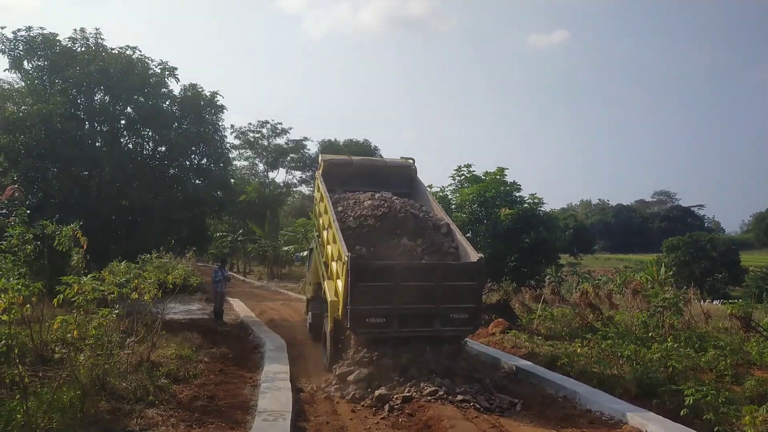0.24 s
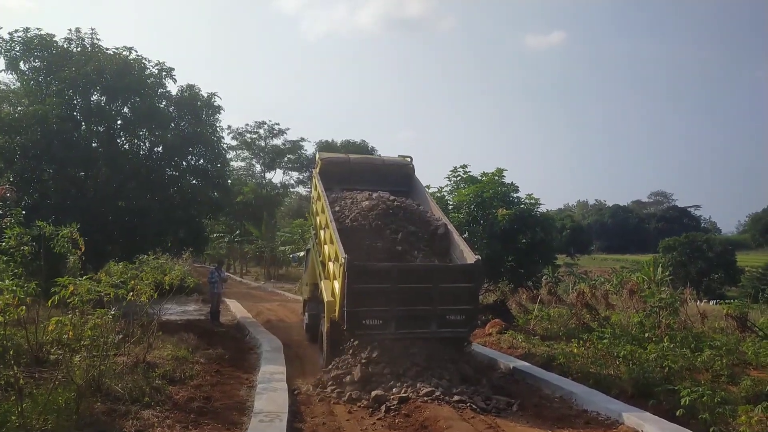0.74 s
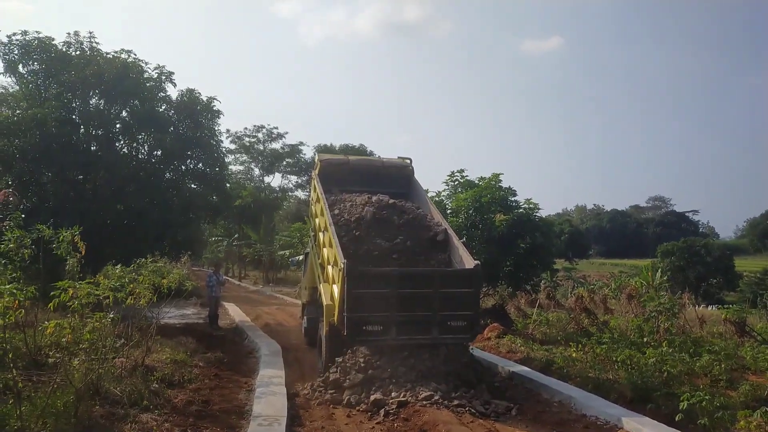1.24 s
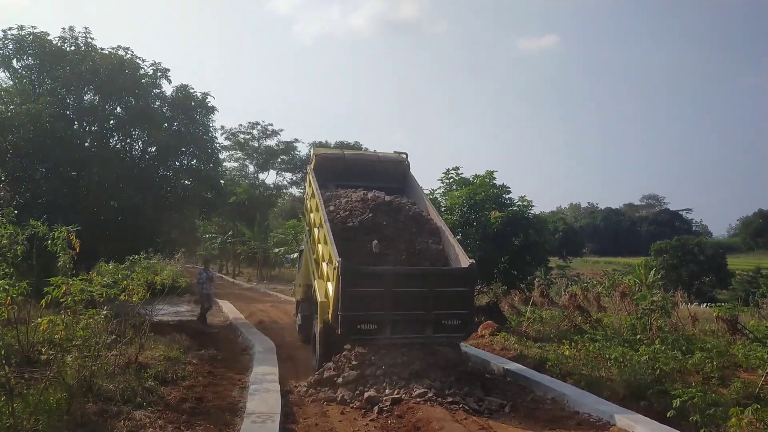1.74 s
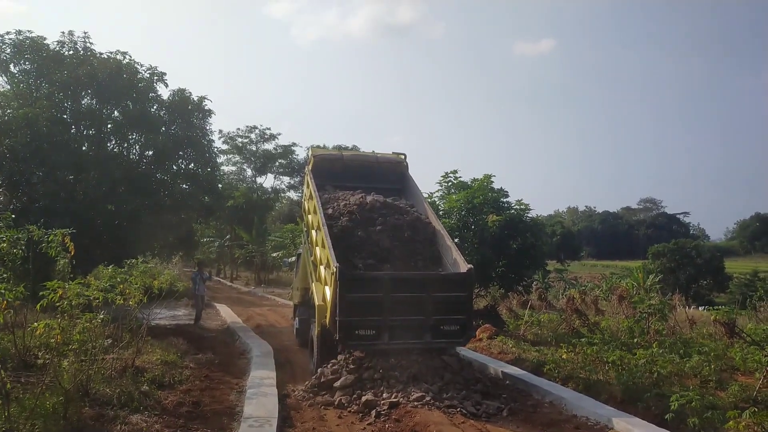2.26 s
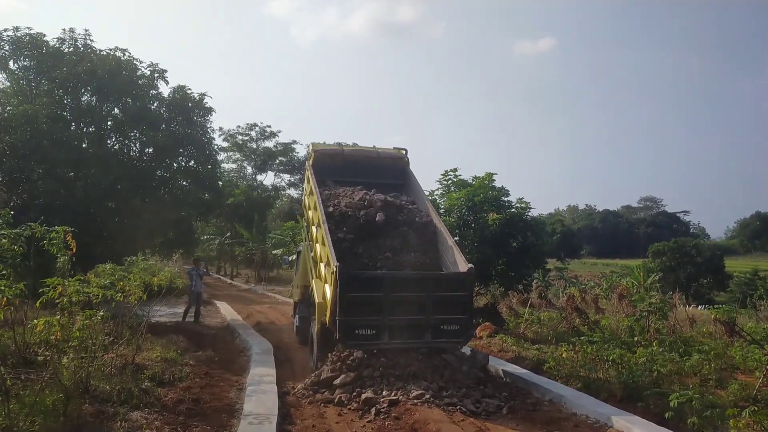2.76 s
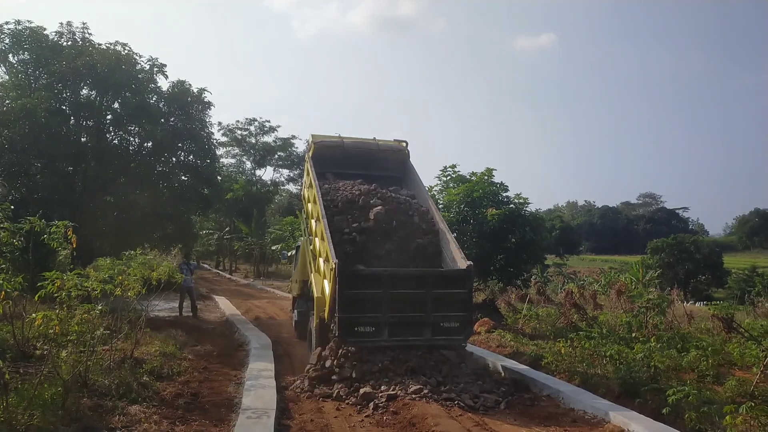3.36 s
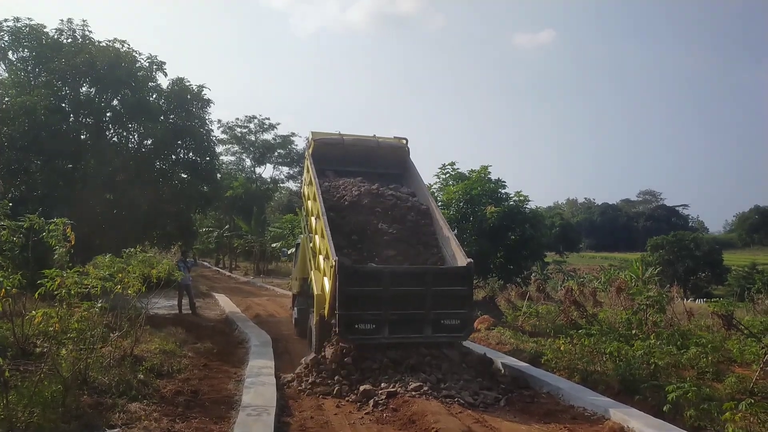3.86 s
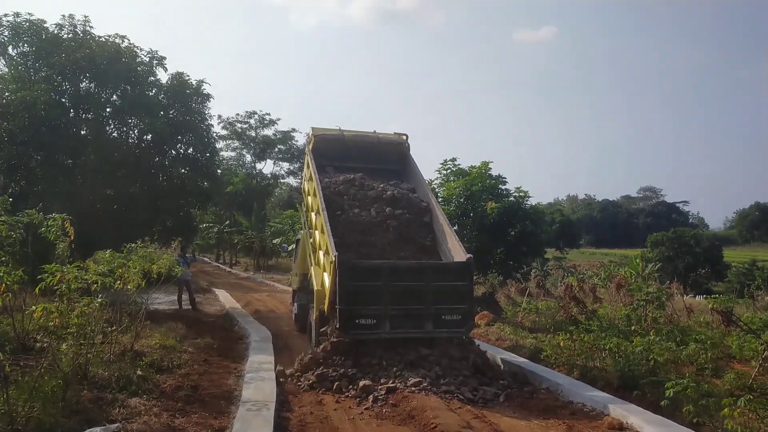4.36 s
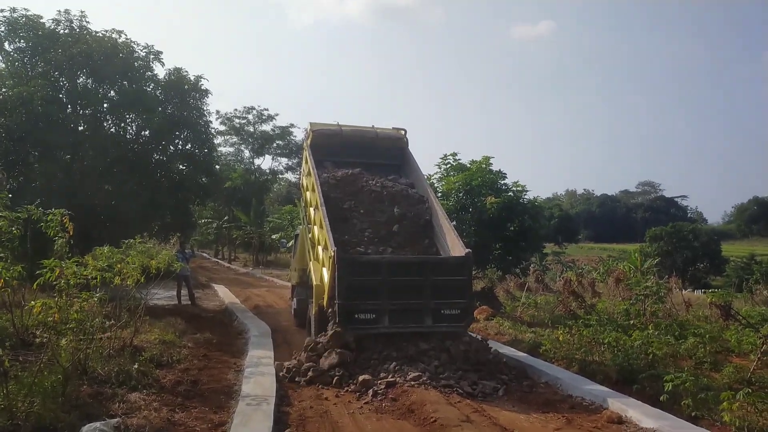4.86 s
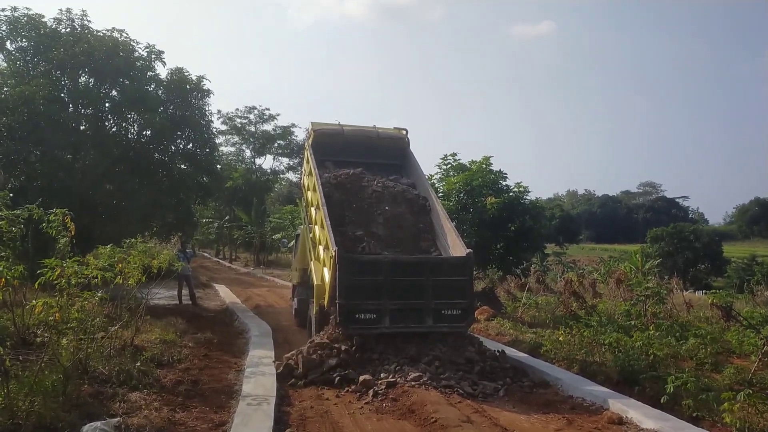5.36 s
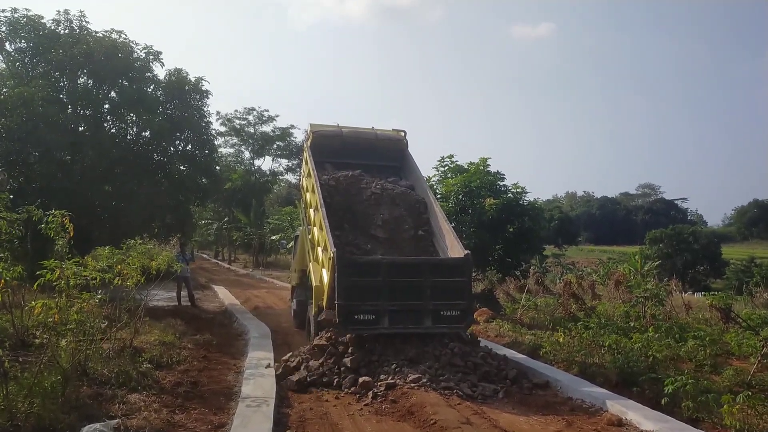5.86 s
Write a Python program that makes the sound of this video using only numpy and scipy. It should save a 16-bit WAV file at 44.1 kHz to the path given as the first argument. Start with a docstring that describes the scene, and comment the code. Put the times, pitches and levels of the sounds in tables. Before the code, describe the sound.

Outdoors, a tipper truck sheds a load of rocks. A dense run of hard clacks and rattling gravel opens, thins around the second second, then picks up strongly near three seconds. Each rock cracks, crumbles and briefly rings the steel bed. Low thumps grow more frequent later, while a diesel hums steadily and wind buffets the microphone. A faint diffuse echo returns from trees.

```python
"""Rocks clack and gravel slides as a tipper truck unloads outdoors, its diesel running low and steady.
Each clack is a crack plus a crumbling burst of noise, loose chips and a ring of the steel bed.
Heavy rocks thump with a low swinging tone; chips snap; pebbles, grit and sand make the slide.
Behind them are a faint echo from trees, an engine hum with puffs of clatter, and low wind rumble."""
import sys
import numpy as np
from scipy import signal
from scipy.fft import rfft, irfft, next_fast_len
from scipy.io import wavfile
from scipy.ndimage import uniform_filter1d, minimum_filter1d, map_coordinates

SR = 44100
rng = np.random.default_rng(int(sys.argv[2]) if len(sys.argv) > 2 else 0)


def transcribe(u):
    """Save the signal u as a 16-bit wav file named by the first command-line argument.

    u: samples, shape (n,) or (channels, n), limited to [-1, 1]; the rate is SR.
    q: integer samples, one column per channel.
    """
    v = np.clip(np.atleast_2d(u).T, -1, 1)
    q = np.round(v * 32767).astype(np.int16)
    wavfile.write(sys.argv[1], SR, q)


N = 269451  # length in samples
TOP_HZ = 15550  # nothing is kept from here up


def amp(db):
    """Turn decibels into a gain."""
    return 10 ** (np.asarray(db) / 20)


def unit(x):
    """Scale a sound to rms 1."""
    return x / np.sqrt(np.mean(x ** 2) + 1e-20)


def curves(rows):
    """Draw straight lines between table rows: one value per sample for each column after the time."""
    s, *cols = np.transpose(rows)
    return [np.interp(np.arange(N) / SR, s, c) for c in cols]


def wobble(rate, size=N):
    """A smooth random curve through `rate` random points per second."""
    knots = rng.standard_normal(int(size * rate / SR) + 4)
    return map_coordinates(knots, [np.arange(size) * rate / SR])


def filtered(x, response):
    """Multiply the spectrum of x by a gain that depends on frequency."""
    m = next_fast_len(len(x) + 8192)
    spectrum = rfft(x, m) * response(np.fft.rfftfreq(m, 1 / SR))
    return irfft(spectrum, m)[:len(x)]


def coloured(x, points):
    """Shape x by (f/Hz, level/dB) points joined on a log frequency axis, then scale to rms 1."""
    f, db = np.transpose(points)
    return unit(filtered(x, lambda hz: amp(np.interp(np.log(hz + 1), np.log(f), db))))


def fade(t, t60):
    """Exponential decay that drops 60 dB in t60 seconds."""
    return np.exp(-np.log(1000) * t / max(t60, 1e-3))


def add(track, s, sound):
    """Mix a sound into the track at time s, cut off at the end of the track."""
    start = max(round(s * SR), 0)
    part = track[start:start + len(sound)]
    part += sound[:len(part)]


def ticks(rate, spread_db):
    """Random contacts, `rate` per second on average, with sizes scattered in dB."""
    hits = rng.random(N) < rate / SR
    return hits * amp(spread_db * np.clip(rng.standard_normal(N), -2, 2))


def stony(x, spread_db, count=52):
    """Every stone has its own shape, and so its own random resonances."""
    hz = np.geomspace(300, TOP_HZ, count)
    return coloured(x, np.transpose([hz, spread_db * rng.standard_normal(count)]))


# Ringing tones (modes) of the steel bed: f/Hz, typical level/dB, time to fall 60 dB t60/s
BED_MODES = [(521, -2, 0.4), (605, -3, 0.26), (677, 0.5, 0.22), (715, -6.5, 0.66), (805, -14, 0.22),
             (923, -11, 0.45), (971, -1, 0.17), (1245, -8, 0.089), (1367, 1, 0.2), (1502, -12, 0.42),
             (1937, 1.5, 0.21), (1995, -6.5, 0.17), (2980, -12, 0.16)]


def bed_ring(t):
    """The steel bed answers a blow with decaying tones; each blow excites them differently."""
    hz, db, t60 = np.transpose(BED_MODES)
    strength = amp(db + 2.7 * rng.standard_normal(len(BED_MODES)))
    phase = rng.uniform(0, 2 * np.pi, len(BED_MODES))
    ring = np.zeros(len(t))
    for gain, f, start, decay in zip(strength, hz, phase, t60):
        ring += gain * np.sin(2 * np.pi * f * t + start) * fade(t, decay)
    return ring / np.linalg.norm(strength)


# Rocks striking: t/s, relative level/dB, hardness (tilt up to 2200 Hz, dB per octave),
# grit (treble level/dB at 4600 Hz)
ROCKS = [(0.006, -22, 1.5, -6), (0.051, -22, 2.5, -1.5), (0.137, -28, 2, -2), (0.158, -25.5, -3, 1),
         (0.174, -25.5, -3, 0), (0.202, -24, -3.5, -5), (0.288, -32, 4, -9), (0.337, -21, -0.5, -0.5),
         (0.415, -33.5, 2, -10), (0.463, -33.5, 6, 2), (0.712, -19.5, 8, -4.5), (0.736, -22, -1, 0.5),
         (0.843, -21, 5.5, 1), (0.888, -37.5, -7, -10), (0.942, -31, -8, -10), (1.013, -28.5, 2, 3.5),
         (1.147, -30, -3.5, -17), (1.222, -28, 0.5, -5), (1.528, -36, 9, 6), (1.84, -29.5, 0, 2),
         (2.05, -36, -0.5, -17), (2.311, -25, -3, 0), (2.338, -34.5, 10, 3), (2.437, -37.5, -5, 7.5),
         (2.833, -29, -2, 8), (2.845, -25, -5, -4), (2.867, -20.5, 5, 0.5), (2.913, -19, -3, -6.5),
         (2.934, -30, -2, -5), (3.048, -30, 13, 1), (3.085, -27.5, -5, -21), (3.125, -26.5, -1.5, -3),
         (3.166, -25.5, 3.5, -1), (3.295, -26.5, -0.5, -3.5), (3.344, -26, -9, -6), (3.494, -30.5, 11, -2),
         (3.575, -20.5, 0.5, -3), (3.619, -33.5, -4, 3), (3.701, -25.5, -2, -8), (3.843, -31.5, -3.5, 5.5),
         (3.964, -30.5, -8, -19), (4.16, -31.5, -6, -2), (4.262, -34, -6, -1), (4.3, -22.5, -1, -2),
         (4.727, -34.5, -5.5, -6), (4.838, -33, 1, -4), (4.893, -32.5, 5, 6.5), (5.116, -27, 9, -0.5),
         (5.209, -26, 15, 1.5), (5.226, -29, -4, 0), (5.312, -28, 21, -22), (5.751, -31, -4, -2),
         (5.892, -31.5, -6.5, -7)]
# Basic colour of a rock's contact: f/Hz, level/dB
STONE = [(180, -15), (300, -6.5), (411, -16.5), (654, 5), (785, -6.5), (958, -0.5), (1110, -7.5),
         (1310, 3.5), (1660, -9.5), (1830, -1.5), (2310, -4), (5030, -24), (8140, -23.5), (9140, -31.5),
         (15800, -34)]
ROCK_T60, CRACK_T60, ROCK_ATTACK_S = 0.18, 0.015, .00015  # s: crushing decay, crack decay, rise of the blow
CHIP_RATE, CHIP_T60, SCATTER_T60 = 70, 0.1, 0.49  # shaken-loose chips per s; decay/s of each, of the shower


def rocks(burst_db=6.5, crack_db=5, ring_db=-5, crumble_db=3, crumble_rate=300, firm_s=0.042,
          shape_db=2, scatter_db=-21, dust_growth=2.0):
    """Each rock lands with a crack and a burst of crushing contacts, scatters chips and rings the bed."""
    out, t = np.zeros(N), np.arange(SR // 3) / SR
    corners = np.log2([400, 1300, 2200, 4600, 15000])  # Hz, as octaves
    decay = fade(t, ROCK_T60)
    decay_rms = np.sqrt(np.mean(decay ** 2))
    for s, db, hardness, grit_db in ROCKS:
        # hardness tilts the clack around 1300 Hz; grit sets the treble, dust_growth the very top
        tilt = np.r_[hardness * (corners[:3] - corners[1]), grit_db, dust_growth * grit_db]

        def contact(x):
            """Stone colour, tilted by this rock's hardness and grit."""
            stone = coloured(x, STONE)
            return unit(filtered(stone, lambda hz: amp(np.interp(np.log2(hz + 1), corners, tilt))))

        crush = contact(stony(rng.standard_normal(len(t)), spread_db=shape_db))
        # the crumbling flutter is strongest at the blow and dies away
        flutter_db = -crumble_db * fade(t, firm_s) * wobble(crumble_rate, size=len(t))
        burst = decay * amp(flutter_db)
        # loosened chips land one by one
        taps = (rng.random(len(t)) < CHIP_RATE / SR) * rng.uniform(0.21, 1, len(t))
        chip_levels = signal.fftconvolve(taps, fade(t, CHIP_T60))[:len(t)]
        scatter = unit(chip_levels) * fade(t, SCATTER_T60)
        loudness = np.hypot(burst, amp(scatter_db) * scatter)
        blow = amp(burst_db) * unit(crush * loudness) * decay_rms
        # the first contact cracks and rings the steel
        blow += amp(crack_db) * contact(rng.standard_normal(len(t))) * fade(t, CRACK_T60)
        blow += amp(ring_db) * bed_ring(t)
        add(out, s, amp(db) * blow * (1 - np.exp(-t / ROCK_ATTACK_S)))
    return out


# Heavy, dull thumps: t/s, relative level/dB, thud level/dB before its trim, swing pitch f/Hz
THUMPS = [(0.334, -24, 1, 100), (0.944, -13.5, -12.5, 102), (1.834, -10, -13, 94), (2.311, -5, -13.5, 99),
          (2.637, -16, -28, 140), (2.702, -13, -25, 57), (3.086, -18.5, -10, 77.5),
          (3.755, -12.5, -13.5, 117), (3.964, -16, -5.5, 130), (4.052, -5.5, -16, 53.4),
          (4.156, -8.5, -7.5, 75.5), (4.298, -9.5, -10, 107), (4.895, -17, -3.5, 89), (4.944, -13, -20, 97),
          (5.316, -10, -13, 61), (5.365, -5.5, -6, 81), (5.42, -12, -10, 88), (5.683, -12.5, -14.5, 55.7),
          (5.953, -5.5, -15, 68), (6.088, -8, -11, 113)]
# Colour of the dull thud: f/Hz, level/dB
THUD = [(80, -15), (130, 4), (170, 6.5), (215, 3.5), (280, 3), (340, -9), (430, -10.5), (620, -48)]
THUMP_T60, THUD_T60 = 0.16, .13  # decay/s of the low swing and of the dull thud


def thumps(tone_db=-5, thud_db=1.0, attack=0.0043, waver=0.075):
    """A heavy rock gives a few uneven low swings and a dull thud of noise."""
    out, t = np.zeros(N), np.arange(SR // 3) / SR
    rise = 1 - np.exp(-t / attack)  # attack in s
    life, thud_life = rise * fade(t, THUMP_T60), rise * fade(t, THUD_T60)
    thud_rms = np.sqrt(np.mean(thud_life ** 2))
    for s, db, dull_db, hz in THUMPS:
        pitch = hz * (1 + waver * wobble(106, size=len(t)))
        swing = life * np.sin(2 * np.pi * np.cumsum(pitch) / SR)
        thud = unit(coloured(rng.standard_normal(len(t)), THUD) * thud_life) * thud_rms
        add(out, s, amp(db) * (amp(tone_db) * swing + amp(dull_db + thud_db) * thud))
    return out


# How much gravel slides down the bed: t/s, flow level/dB before the gravel trim
SLIDE = [(0, -27.5), (.31, -28), (.47, -35), (.75, -36), (.9, -27), (1.19, -32.5), (1.29, -39.5),
         (2.23, -41), (2.74, -38.5), (2.91, -35), (3.4, -33.5), (3.93, -30.5), (4.19, -33), (4.37, -33),
         (4.7, -36), (5.0, -36.5), (5.48, -37), (6.11, -37.5)]
# Colour of rattling gravel, also of the engine's clatter: f/Hz, level/dB
GRAVEL = [(190, -8), (330, -3), (373, -22), (401, -13), (563, 1.5), (893, -2.5), (972, -0.5), (1070, -2.5),
          (1250, 2.5), (1680, -1), (1920, 2.5), (2090, -1.5), (2360, 2.5), (3650, -12.5), (6000, -28.5),
          (7800, -35), (13200, -120)]
# Bright colour of sand and grit, also of a chip's snap: f/Hz, level/dB
SAND = [(2000, 10), (4000, 9.5), (5200, 3), (5600, 5.5), (6200, 2.5), (7900, 7), (9000, 0.5), (12000, -2.5),
        (15500, 3.5)]
PEBBLE_RATE, PEBBLE_T60 = 9, 0.063  # contacts per s for each pebble shape; decay/s
# hiss level/dB at the start for average flow; dB per dB of flow; fines running out, dB per s
SAND_DB, SAND_FOLLOWS, SAND_DRAIN_DB_PER_S = -40, 0.54, 1.23


def slide(gravel_db=-1, grit_db=-5, ring_db=-23, shape_db=4.0, count=20):
    """Pebbles of many shapes rattle down the bed; grit ticks over sand hiss that slowly runs out."""
    flow_db, = curves(SLIDE)
    hiss_db = SAND_DB + SAND_FOLLOWS * (flow_db - flow_db.mean())
    hiss_db -= SAND_DRAIN_DB_PER_S * np.arange(N) / SR
    t = np.arange(SR // 4) / SR
    rattle = np.zeros(N)
    for _ in range(count):
        pebble = stony(rng.standard_normal(len(t)), spread_db=shape_db) * fade(t, PEBBLE_T60)
        pebble += amp(ring_db) * bed_ring(t)
        rattle += signal.oaconvolve(ticks(rate=PEBBLE_RATE, spread_db=1.5), pebble)[:N]
    bursts = signal.oaconvolve(ticks(rate=98, spread_db=8.0), fade(t, 0.047))[:N]
    grit = coloured(bursts * rng.standard_normal(N), SAND)
    sand = coloured(rng.standard_normal(N), SAND) * amp(wobble(30))
    gravel = amp(flow_db + gravel_db) * coloured(rattle, GRAVEL)
    return gravel + amp(hiss_db) * (sand + amp(grit_db) * grit)


# Small, hard chips clicking on the heap: t/s, relative level/dB, centre of the ring f/Hz
CHIPS = [(0.666, -26, 2300), (1.429, -25, 2860), (2.285, -25, 3460), (4.539, -24, 2040), (4.787, -28, 2280),
         (5.339, -18, 2950), (5.668, -34, 7660)]


def chips(ring_db=-7, snap_db=-15, t60=0.07, width=0.4):
    """A small chip gives a bright snap and a very short ring, spread broadly around its pitch."""
    out, t = np.zeros(N), np.arange(SR // 8) / SR
    for s, db, pitch in CHIPS:
        noise = rng.standard_normal(len(t))
        ring = unit(filtered(noise, lambda hz: np.exp(-((hz / pitch - 1) / width) ** 2)))
        snap = coloured(rng.standard_normal(len(t)), SAND)
        click = amp(ring_db) * ring + amp(snap_db) * snap
        add(out, s, amp(db) * click * fade(t, t60))
    return out


ECHO_DB = -20  # level of the trees' answer


def trees(x, t60=0.62, delay=0.095):
    """Trees beside the track return a faint, diffuse echo: a noise tail that swells, then decays."""
    t = np.arange(SR // 2) / SR
    noise = coloured(rng.standard_normal(len(t)), [(200, -2.5), (2500, -5.5), (10000, -15.5)])
    tail = noise * fade(t, t60) * (1 - np.exp(-t / delay))
    return signal.fftconvolve(x, tail / np.linalg.norm(tail))[:N]


# Engine hum: multiple of the firing rate, typical rms level/dB
ENGINE = [(1, -47), (2, -50), (3, -69), (4, -74), (5, -56.5), (6, -59.5)]
FIRING_HZ = 37.7  # average firing rate


def engine(clatter_db=-48, rough_db=2):
    """The diesel hums at multiples of its firing rate, with a puff of clatter at every firing."""
    firing_rate = FIRING_HZ * (1 + 0.01144 * wobble(2.8))
    turn = 2 * np.pi * np.cumsum(firing_rate) / SR
    hum = np.zeros(N)
    for multiple, db in ENGINE:
        level = np.sqrt(2) * amp(db + rough_db * wobble(4.25))
        hum += level * np.sin(round(multiple) * turn + rng.uniform(0, 2 * np.pi))
    clatter = coloured(rng.standard_normal(N), GRAVEL) * np.exp(np.cos(turn))
    return hum + amp(clatter_db) * unit(clatter)


# Wind on the microphone: t/s, level/dB
WIND = [(0, -49), (.25, -36), (1.2, -39.5), (2.4, -37.5), (2.72, -29), (3.5, -39.5), (4.05, -27),
        (4.27, -34.5), (4.7, -46.5), (5.36, -23), (5.65, -31.5), (6.11, -27.5)]
# Colour of the wind's low rumble: f/Hz, level/dB
BUFFET = [(10, 2), (25, -1.5), (45, -2.5), (90, -0.5), (160, -7.5), (280, -18.5), (420, -28.5), (900, -50)]


def wind(level_db=0, lump_db=3, lump_rate=18):
    """Eddies buffet the microphone in low lumps of noise."""
    buffet_db, = curves(WIND)
    lumps = amp(lump_db * wobble(lump_rate))
    rumble = unit(coloured(rng.standard_normal(N), BUFFET) * lumps)
    return amp(buffet_db + level_db) * rumble


def scene():
    """Mix the falling load, its echo, the thumps, the engine and the wind."""
    load = rocks() + chips() + slide()
    echo = amp(ECHO_DB) * trees(load)
    return (load + echo + thumps() + engine() + wind())[None]


LIMIT, LIMIT_HOLD_S = 0.5, 0.0035  # ceiling (of full scale); window/s for holding and smoothing the gain


def record(dry):
    """A quick limiter holds down the loudest peaks; then everything from TOP_HZ up is removed."""
    size = max(round(LIMIT_HOLD_S * SR), 1)
    needed_gain = LIMIT / np.maximum(np.abs(dry), LIMIT)
    gain = uniform_filter1d(minimum_filter1d(needed_gain, size), size)
    return np.array([filtered(channel, lambda hz: hz < TOP_HZ) for channel in dry * gain])


dry = scene()
out = record(dry)
transcribe(out)
```